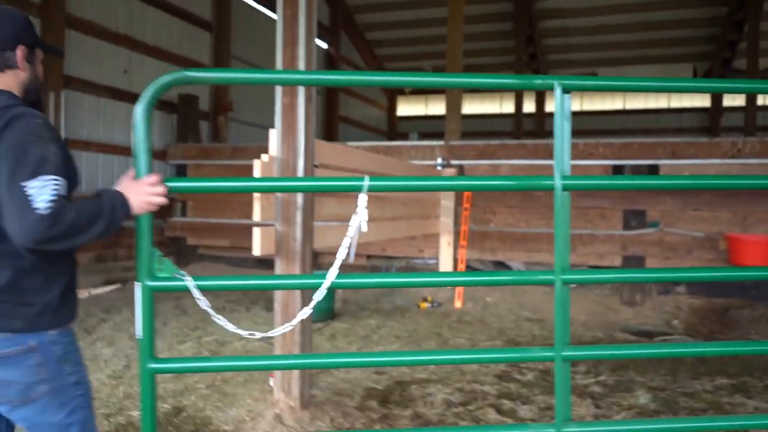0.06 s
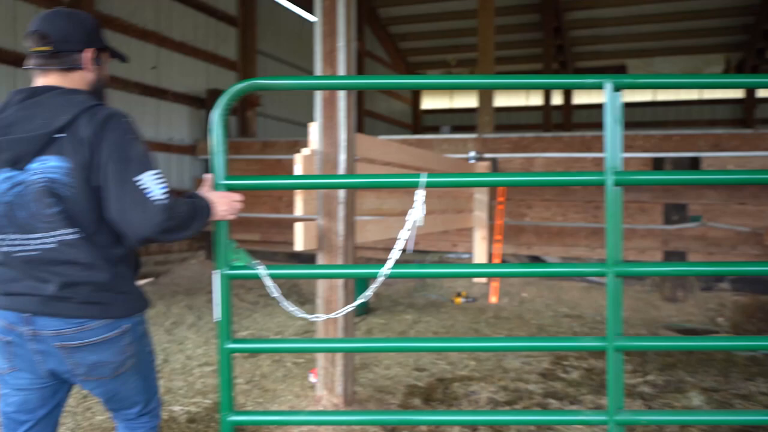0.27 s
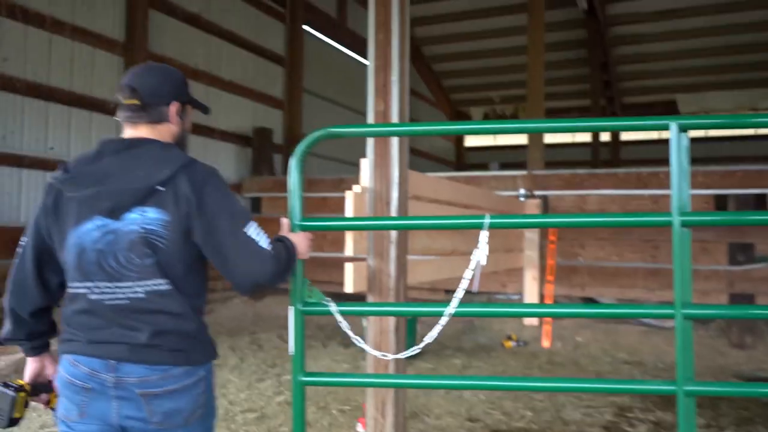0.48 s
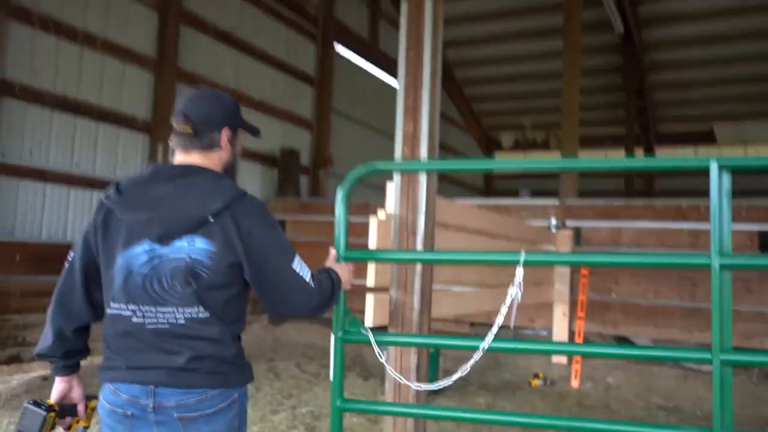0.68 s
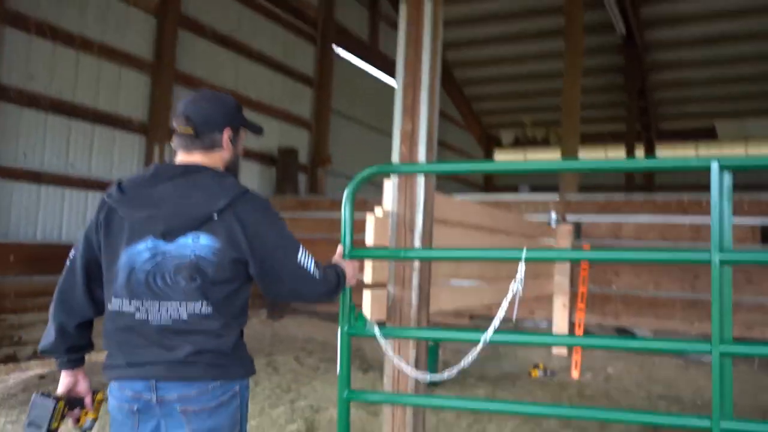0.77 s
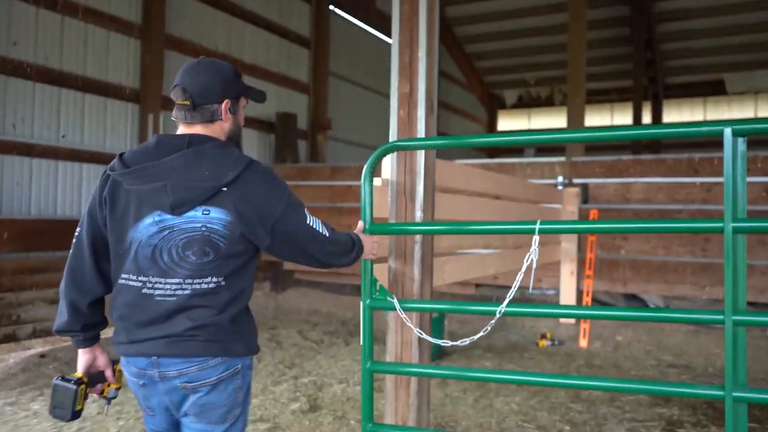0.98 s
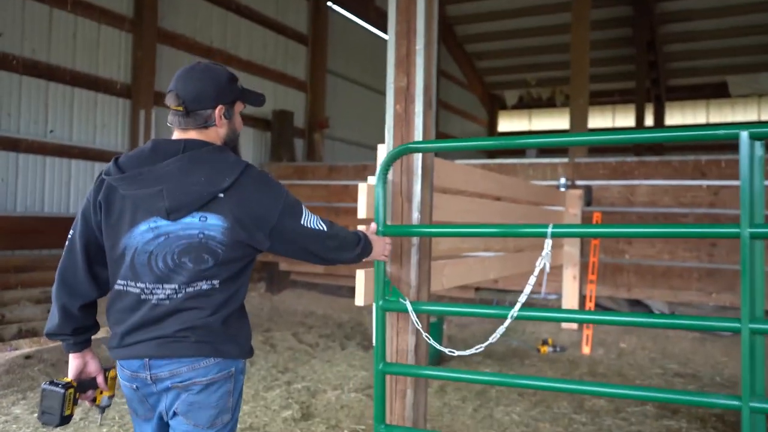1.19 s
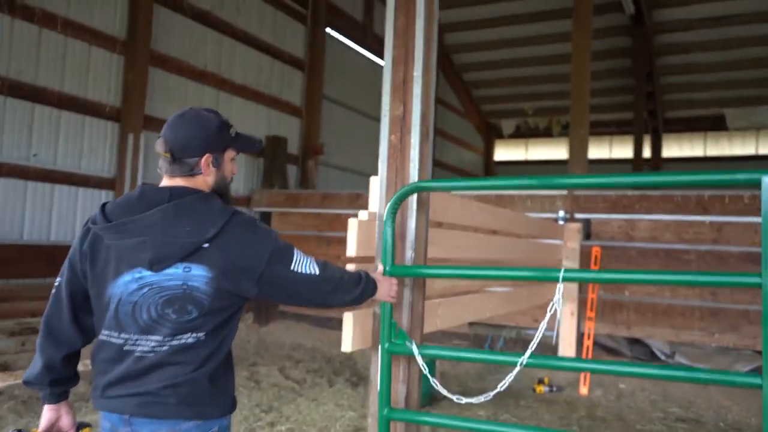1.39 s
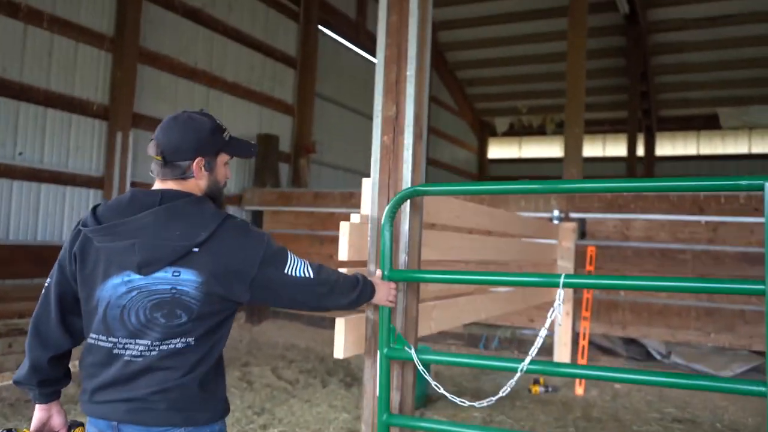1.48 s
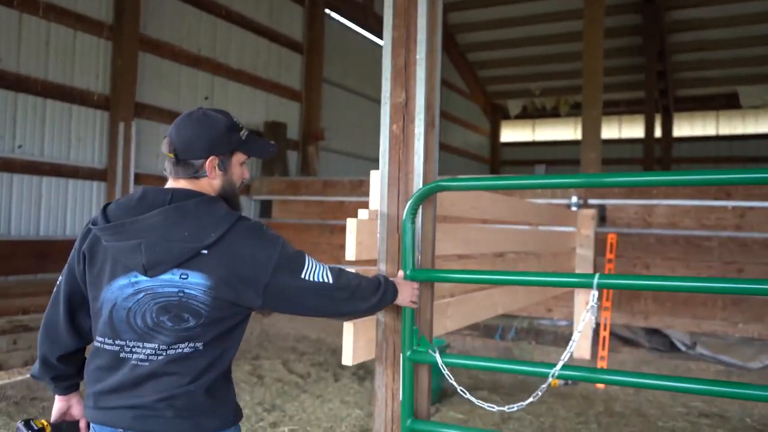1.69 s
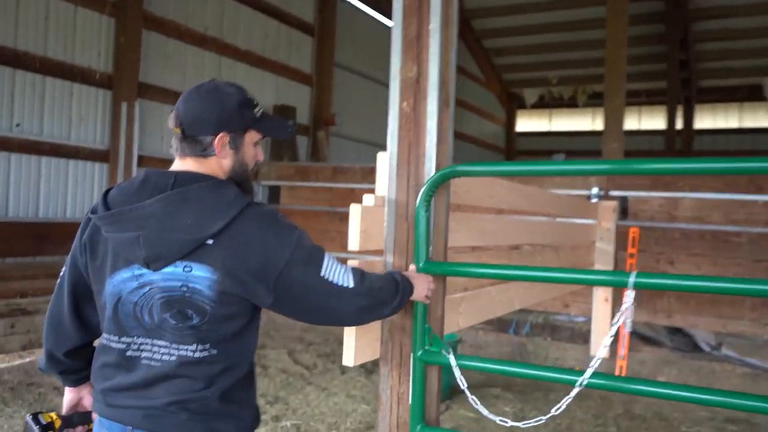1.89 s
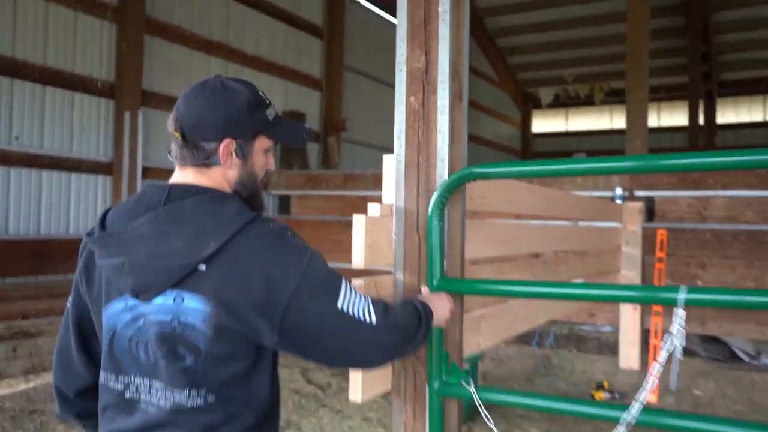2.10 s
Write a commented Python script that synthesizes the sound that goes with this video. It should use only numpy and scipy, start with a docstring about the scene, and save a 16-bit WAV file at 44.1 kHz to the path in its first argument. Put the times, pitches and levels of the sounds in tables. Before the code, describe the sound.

A steel tube gate clanks in a barn: after a faint scuff and chain jostle, the chain slaps the bars sharply at about 0.25-0.3 s, ringing brightly. A second ringing clatter comes at 0.7-0.9 s. Duller chain knocks follow from 1.3 to 1.7 s as the ring is damped. Boots scuff dirt throughout, small clicks near 1.9 s, low wind rumbling and thumping the microphone.

```python
"""In a barn, a steel tube gate is swung shut. Its hanging chain slaps the bars in two ringing bursts,
then rattles more dully as the gate slows at the post. Boots scuff the dirt floor among small clicks,
and moving air rumbles on the microphone. Chain, boots and air are shaped noise; the tubes and one
lone link are decaying sines. The barn adds a diffuse tail to chain, tubes and boots."""
import sys
import numpy as np
from scipy import signal
from scipy.fft import rfft, irfft, next_fast_len
from scipy.io import wavfile

SR = 44100
rng = np.random.default_rng(int(sys.argv[2]) if len(sys.argv) > 2 else 0)


def transcribe(signal):
    """Save signal, clipped to [-1, 1], as a 16-bit WAV file at the path in sys.argv[1]."""
    frames = np.atleast_2d(signal).T
    limited = np.clip(frames, -1, 1)
    pcm = np.round(limited * 32767).astype(np.int16)
    wavfile.write(sys.argv[1], SR, pcm)


N = 94726
T = np.arange(N) / SR

# the chain strikes the bars: (t/s, clatter level/dB, tube ring level/dB, treble/dB)
STRIKES = [(0.2494, -25, -23, 10), (0.2700, -33.5, -35, 12.5), (0.2841, -24, -22.5, 5.5),
           (0.297, -29, -46, 6), (0.331, -38, -46, -14), (0.3742, -45, -54, 3), (0.486, -36.5, -43, -18),
           (0.5850, -40, -49, -12), (0.7173, -27, -29, 1), (0.737, -32, -50, 3.5), (0.8057, -30.5, -39, 8),
           (0.834, -25, -32.5, -2.5), (0.896, -29, -28, -12), (0.976, -60, -42, -24),
           (1.0554, -57.5, -62, 9), (1.111, -60, -54, 13)]


def from_db(db):
    """Decibels to gain."""
    return 10 ** (np.asarray(db) / 20)


def rms_one(x):
    """Scale to rms 1."""
    return x / np.sqrt(np.mean(x ** 2) + 1e-20)


def at_hz(points, hz):
    """Read a table on a log-frequency axis."""
    f, v = np.transpose(points)
    return np.interp(np.log(np.maximum(hz, 1)), np.log(f), v)


def level(rows):
    """Gain over time, straight lines in dB between (t/s, level/dB) rows."""
    return from_db(np.interp(T, *np.transpose(rows)))


def noise(spectrum):
    """Noise coloured by (f/Hz, level/dB) rows, rms 1, nothing below 4 Hz."""
    size = next_fast_len(N)
    hz = np.arange(size // 2 + 1) * SR / size
    white = rfft(rng.standard_normal(size))
    coloured = white * from_db(at_hz(spectrum, hz)) * (hz > 4)
    return rms_one(irfft(coloured, size)[:N])


def band_noise(hz, q, size):
    """White noise through a single resonance."""
    return signal.lfilter(*signal.iirpeak(hz, q, fs=SR), rng.standard_normal(size))


def dying(t, t60):
    """Exponential decay, falling 60 dB in t60 seconds."""
    return np.exp(-np.log(1000) * t / t60)


def swell(s, db, length):
    """A bell-shaped rise and fall of gain; length is its standard deviation in seconds."""
    return from_db(db) * np.exp(-.5 * ((T - s) / length) ** 2)


def add(out, s, x):
    """Mix x into out from time s."""
    i = int(np.clip(s * SR, 0, N - 1))
    out[i:i + len(x)] += x[:N - i]


def shelf(x, treble_db):
    """Raise or lower the treble with a second-order shelf."""
    treble_hz = 4180
    root = from_db(treble_db / 2)
    w = 2 * SR * np.tan(np.pi * treble_hz / SR)  # prewarped for the bilinear transform
    above = [root ** 2, np.sqrt(2) * root * w, w * w]
    below = [1, np.sqrt(2) * w, w * w]
    return signal.lfilter(*signal.bilinear(above, below, SR), x)


def barn(x, wet_db):
    """Direct sound plus a diffuse tail: noise bands that each die at their own rate."""
    # reverberation of the barn: (f/Hz, t60/s)
    barn_t60 = [(300, 0.2), (1200, 0.99), (3000, 0.84), (6000, 0.36), (14000, 0.13)]
    build_s = 0.0042
    t, tail = T[:SR], 0
    edges = np.geomspace(100, 18000, 13)
    for lo, hi in zip(edges, edges[1:]):
        band_pass = signal.butter(2, [lo, hi], "band", fs=SR, output="sos")
        band = signal.sosfilt(band_pass, rng.standard_normal(SR))
        tail = tail + band * dying(t, at_hz(barn_t60, np.sqrt(lo * hi)))
    tail = tail * (1 - np.exp(-t / build_s))
    tail = tail / np.sqrt(np.sum(tail ** 2))
    return x + from_db(wet_db) * signal.fftconvolve(x, tail)[:N]


def background_air():
    """The barn's background air: coloured noise with a drifting level."""
    # colour of the air: (f/Hz, level/dB)
    air = [(100, 9), (200, -1), (400, 1.5), (700, -0.5), (1200, 3), (2000, -10.5), (3200, -10), (6000, -31),
           (10000, -29.5), (15000, -53)]
    # its course: (t/s, level/dB)
    air_level = [(0, -42.5), (.2, -40), (.6, -45), (1.1, -47.5), (1.5, -44), (1.8, -47), (2.15, -48)]
    return noise(air) * level(air_level)


def wind():
    """Air sways slowly against the microphone, buffets it most at the start and end, and thumps it."""
    # slow air at the microphone: (f/Hz, level/dB), and its course: (t/s, level/dB)
    sway_colour = [(6, -12.5), (11, -10.5), (15, 14), (20, -13), (35, -18.5), (55, -33), (90, -51.5),
                   (160, -51), (400, -84.5)]
    sway_level = [(0, -22), (.25, -5.5), (.4, -14.5), (.72, -6), (.93, -19), (1.1, -11.5), (1.5, -14),
                  (1.7, -10), (2.15, -5)]
    # buffeting, a little higher: (f/Hz, level/dB), and its course: (t/s, level/dB)
    buffet_colour = [(15, -11), (35, 13.5), (70, -1), (110, -23), (200, -34), (400, -43), (900, -88.5)]
    buffet_level = [(0, -17), (.12, -19), (.23, -17.5), (.31, -40), (.7, -31.5), (1.02, -31.5), (1.2, -27),
                    (1.55, -27), (1.68, -18), (1.82, -17), (1.925, -13.5), (1.97, -22), (2.15, -13)]
    # colour of a gust: (f/Hz, level/dB)
    gust_colour = [(30, -20), (70, -5.5), (120, -2.5), (200, -17), (320, -30.5), (800, -66)]
    # gusts thump the microphone: (t/s at the peak, level/dB, length/s)
    gust_times = [(0.244, -38.5, 0.023), (0.267, -43, 0.016), (1.228, -46, 0.086), (1.825, -40, 0.048),
                  (1.877, -32, 0.024), (1.934, -25.5, 0.013)]
    sway = noise(sway_colour)
    evened = rms_one(sway / (np.abs(signal.hilbert(sway)) + .5))  # envelope partly flattened
    gusts = noise(gust_colour) * sum(swell(*gust) for gust in gust_times)
    return evened * level(sway_level) + noise(buffet_colour) * level(buffet_level) + gusts


def boots_and_clicks():
    """Swells of grainy noise, long for scuffs and short for clicks; resonant noise thuds for heels."""
    # scuffs and clicks, with a bright chain jostle at the start and a short dry tick at 1.12 s:
    # (t/s at the peak, level/dB, length/s, treble/dB)
    scuffs_and_clicks = [(0.037, -56.5, 0.13, 11.5), (0.185, -41, 0.036, -2.5), (0.41, -51.5, 0.046, 9.5),
                         (0.585, -42, 0.072, 0), (1.12, -49, 0.00079, 10), (1.217, -61.5, 0.0078, 9.5),
                         (1.29, -58.5, 0.049, 13.5), (1.414, -39, 0.056, -1), (1.854, -44, 0.01, 5),
                         (1.904, -43.5, 0.027, 3), (1.915, -36.5, .002, 0), (1.929, -39.5, 0.0043, 0),
                         (2.052, -45.5, 0.04, -12)]
    # colour shared by scuffs and clicks: (f/Hz, level/dB)
    scuff_colour = [(200, -14), (600, 0.5), (1400, 4), (3200, 4), (6000, -6), (10000, -15), (15000, -18)]
    # heels land: (t/s, level/dB, f/Hz)
    heels = [(.266, -39, 300), (.712, -32, 400), (1.44, -45, 380), (1.69, -45, 310), (2.092, -46, 600)]
    grain_db, heel_t60_s, heel_q = 2.5, .1, 3
    # a random level every 60 samples or so makes the noise grainy
    grain = np.interp(T, np.linspace(0, T[-1], N // 60), rng.standard_normal(N // 60))
    grainy = rms_one(noise(scuff_colour) * from_db(grain_db * grain))
    out = np.zeros(N)
    for s, db, length, treble_db in scuffs_and_clicks:
        out += swell(s, db, length) * shelf(grainy, treble_db)
    for s, db, hz in heels:
        thud = rms_one(band_noise(hz, heel_q, SR // 2))
        add(out, s, from_db(db) * thud * dying(T[:SR // 2], heel_t60_s))
    return out


def ping():
    """One link rings alone, very high: a single decaying sine."""
    out = np.zeros(N)
    ping_s, ping_hz, ping_db, t60_s = .39, 11066, -38.5, 0.39
    add(out, ping_s, from_db(ping_db) * np.sin(2 * np.pi * ping_hz * T) * dying(T, t60_s))
    return out


def tubes():
    """The clear ring of the bars: every strike feeds energy into each mode, until the gate is braked."""
    # clear modes; each burst strikes another spot and so weighs them differently:
    # (f/Hz, level/dB in the first burst, level/dB in the second, t60/s)
    tube_modes = [(797, -28, -15, 1.0), (905, -20, -24, 1.4), (1034, -16, -9, 1.2), (1236, -14, -17, .95),
                  (1464, -12, -17, .5), (1864, -19, -22, 1.8), (2845, -6, -3, 1.2), (2880, -11, -8, 1.3),
                  (2940, -8, -12, .9), (3381, -7, -10, .45), (3514, -7, -13, .38), (3810, -7, -11, .22),
                  (4400, -13, -19, .45), (5445, -13, -10, .48), (5520, -8, -11, .52), (8866, -25, -24, .35)]
    second_burst_s = .7
    damped_s, damped_t60_s = 1.3, .09  # extra damping from here on
    out = np.zeros(N)
    for hz, first_db, second_db, t60 in tube_modes:
        kicks = np.zeros(N)
        for s, _, ring_db, _ in STRIKES:
            mode_db = first_db if s < second_burst_s else second_db
            uneven_db = rng.standard_normal()
            add(kicks, s, from_db([ring_db + mode_db + uneven_db]) ** 2)
        # energy is amplitude squared, hence the doubled decay
        energy = signal.lfilter([1], [1, -dying(2 / SR, t60)], kicks)
        out += np.sqrt(energy) * np.sin(2 * np.pi * (hz * T + rng.random())) / 2
    return out * dying(np.maximum(T - damped_s, 0), damped_t60_s)


def link_run():
    """Links follow each blow: a first touch and a dying run of lighter ones, unit energy in all."""
    touches_per_s, rattle_s, rattle_db = 450, 0.023, -8.5  # rattle_s: time to fall to 1/e
    t = T[:SR // 10]
    touched = rng.random(len(t)) < touches_per_s / SR
    run = touched * rng.standard_normal(len(t)) * from_db(rattle_db) * np.exp(-t / rattle_s)
    run[0] = 1
    return run / np.sqrt(np.sum(run ** 2))


def blows(rows, parts):
    """Each (t/s, level/dB, treble/dB) row rings the (noise, decay) parts afresh with a run of touches."""
    out = np.zeros(N)
    for s, db, treble_db in rows:
        i = rng.integers(N - SR // 2)  # another stretch of noise for every blow
        body = sum(band[i:i + len(decay)] * decay for band, decay in parts)
        rattled = signal.fftconvolve(body, link_run())
        add(out, s, from_db(db) * shelf(rattled, treble_db))
    return out


def chain(count=16):
    """Every blow cracks and rings the links, whose crowded modes blur into dying bands; heard in the barn."""
    # slack links knock together without ringing the tubes: (t/s, level/dB, treble/dB)
    knock_rows = [(1.3285, -40, -5), (1.35, -42, 4.5), (1.3864, -49, 0), (1.4053, -42, -14),
                  (1.444, -44.5, -10), (1.476, -37.5, -20), (1.514, -54, -25), (1.5922, -41, -29),
                  (1.624, -46, -20), (1.6624, -51.5, -21), (2.0465, -47.5, -13)]
    # crowded modes of links and frame: (f/Hz, level/dB), and their decay: (f/Hz, t60/s)
    clatter = [(600, -39), (780, -12), (1050, -4), (1400, 4), (1900, -3), (2500, 0), (3200, 5),
               (4000, -0.5), (4900, -9.5), (5500, 0), (6400, -7.5), (8000, -17.5), (9000, -19.5),
               (10500, -39), (13000, -23), (15500, -31)]
    clatter_t60 = [(800, 0.65), (1400, 0.38), (3000, 0.22), (6000, 0.22), (14000, 0.047)]
    # blurred resonances of the links: (f/Hz, width/Hz, level/dB, t60/s)
    link_rings = [(1064, 68, -18.5, 0.99), (2830, 180, -11, 0.65), (5456, 68, -16.5, 0.44),
                  (9100, 580, -17, 0.1), (13000, 240, -29, 0.11)]
    crack_t60_s, strike_crack_db, knock_crack_db = 0.0068, -1.5, 11.5
    knock_ring_db = -2.5  # against the link rings of a strike
    strike_barn_db, knock_barn_db = -8, -4

    t = T[:SR // 2]
    hz = np.arange(N // 2 + 1) * SR / N
    colour = rfft(noise(clatter))
    edges = np.geomspace(450, 17000, count + 1)
    bands = []
    for lo, hi in zip(edges, edges[1:]):
        band = irfft(colour * (hz >= lo) * (hz < hi), N)
        bands.append((band, dying(t, at_hz(clatter_t60, np.sqrt(lo * hi)))))
    rings = []
    for f, width, db, t60 in link_rings:
        rings.append((from_db(db) * rms_one(band_noise(f, f / width, N)), dying(t, t60)))
    softer_rings = [(from_db(knock_ring_db) * ring, decay) for ring, decay in rings]
    crack, snap = noise(clatter), dying(t, crack_t60_s)

    strike_rows = [(s, db, treble_db) for s, db, _, treble_db in STRIKES]
    strikes = blows(strike_rows, bands + rings + [(from_db(strike_crack_db) * crack, snap)])
    knocks = blows(knock_rows, bands + softer_rings + [(from_db(knock_crack_db) * crack, snap)])
    return barn(strikes, strike_barn_db) + barn(knocks, knock_barn_db)


def scene():
    """Gate, boots and clicks in the barn, over background air and wind; the lone link is heard dry."""
    tube_barn_db, floor_barn_db = -10, -13.5
    gate = chain() + barn(tubes(), tube_barn_db) + ping()
    floor = barn(boots_and_clicks(), floor_barn_db)
    return (gate + floor + background_air() + wind())[None]


def record(dry):
    """The top is cut steeply by an elliptic low-pass."""
    cutoff_hz = 15700
    low_pass = signal.ellip(10, .2, 80, cutoff_hz, fs=SR, output="sos")  # ripple dB, stop-band dB
    return signal.sosfilt(low_pass, dry)


dry = scene()
out = record(dry)
transcribe(out)
```